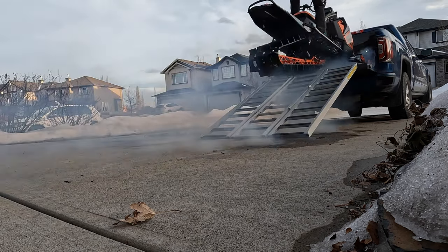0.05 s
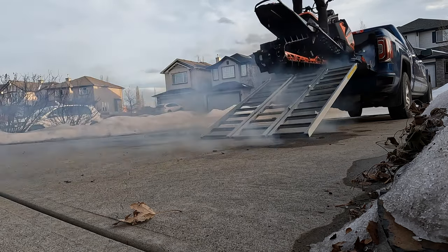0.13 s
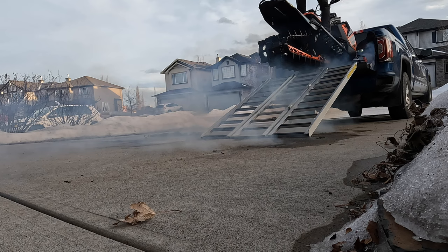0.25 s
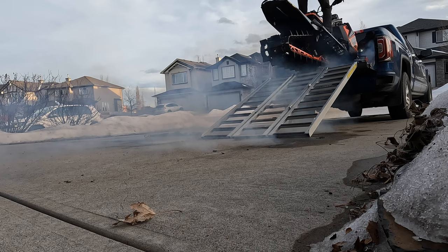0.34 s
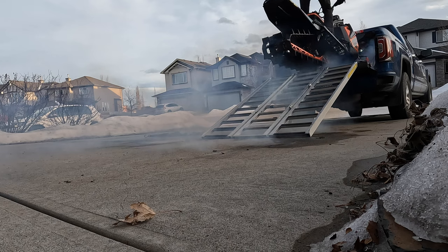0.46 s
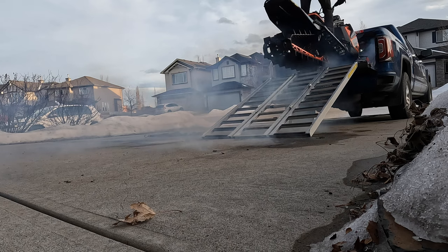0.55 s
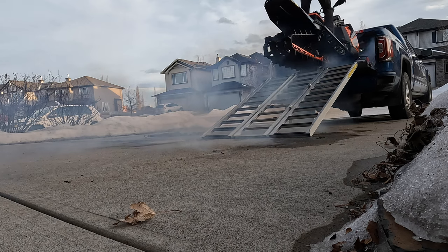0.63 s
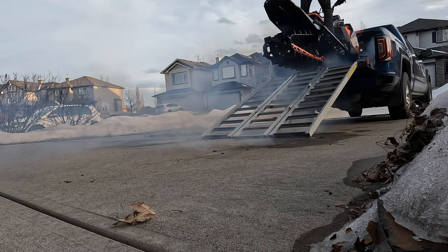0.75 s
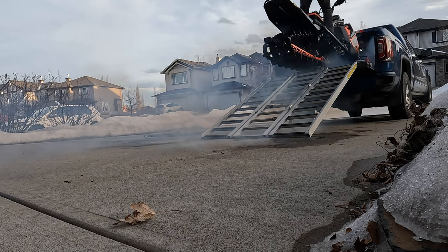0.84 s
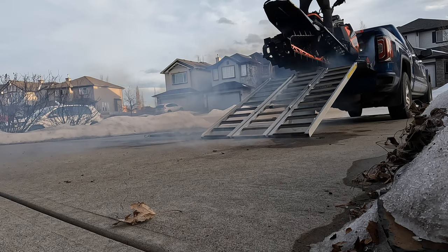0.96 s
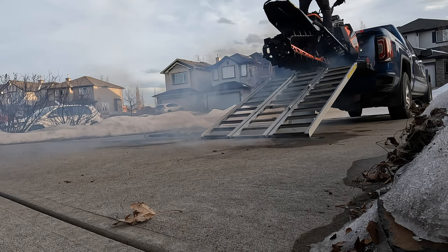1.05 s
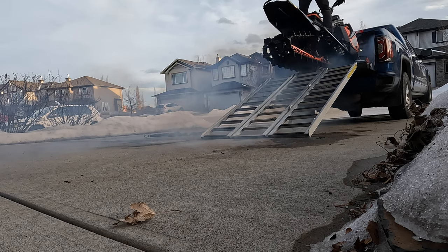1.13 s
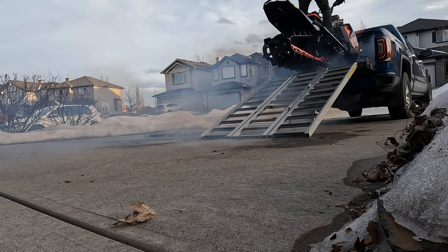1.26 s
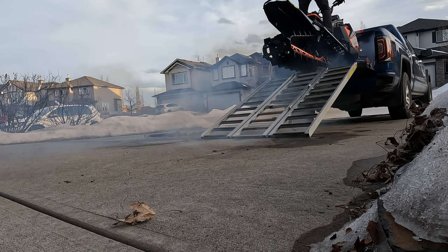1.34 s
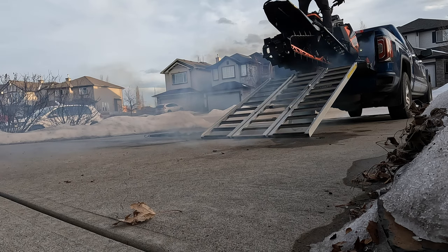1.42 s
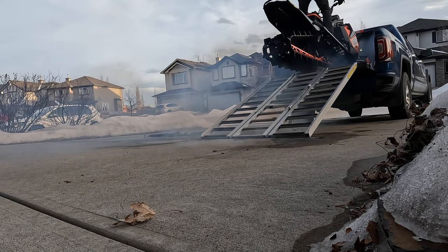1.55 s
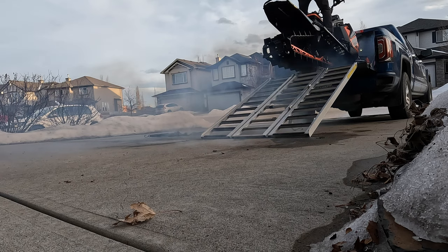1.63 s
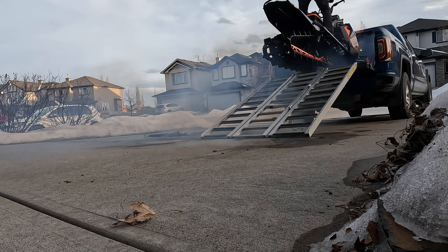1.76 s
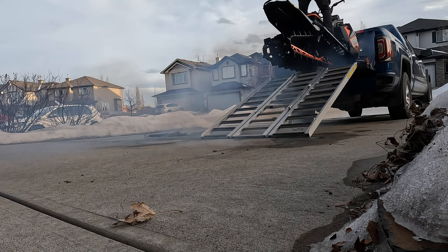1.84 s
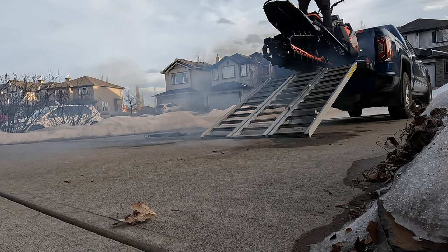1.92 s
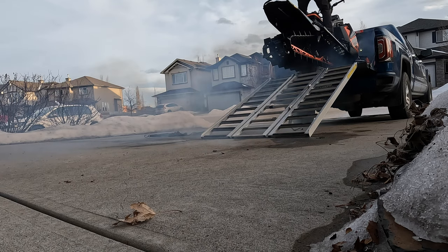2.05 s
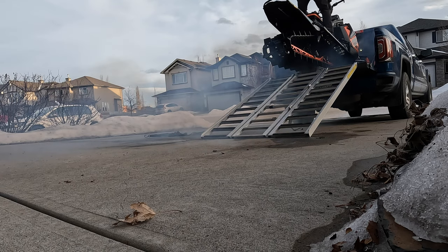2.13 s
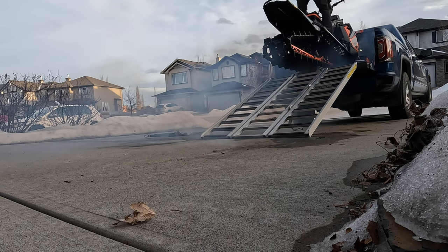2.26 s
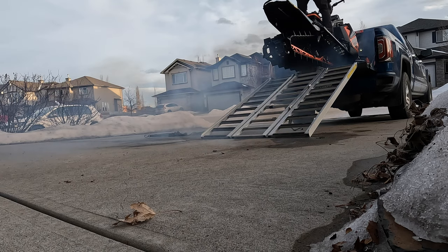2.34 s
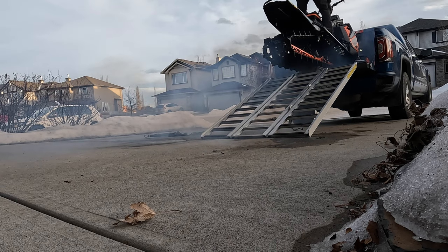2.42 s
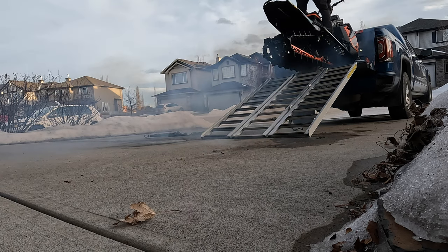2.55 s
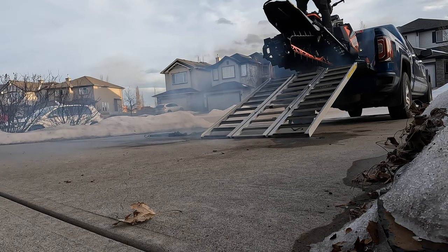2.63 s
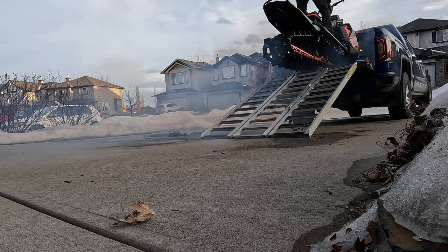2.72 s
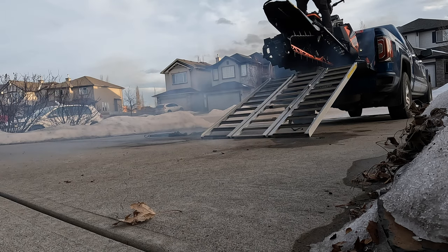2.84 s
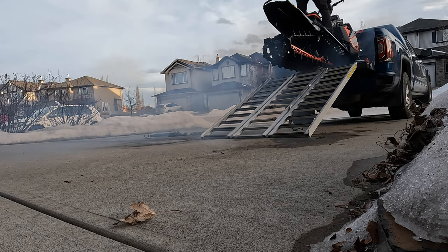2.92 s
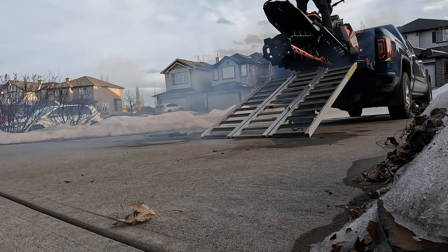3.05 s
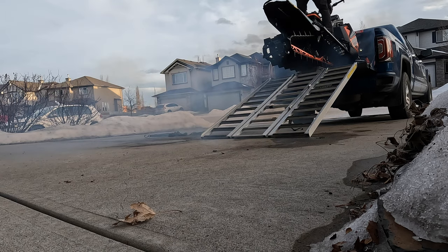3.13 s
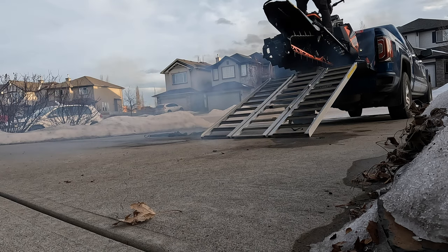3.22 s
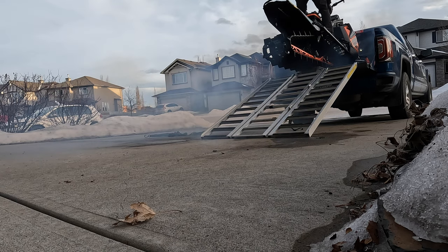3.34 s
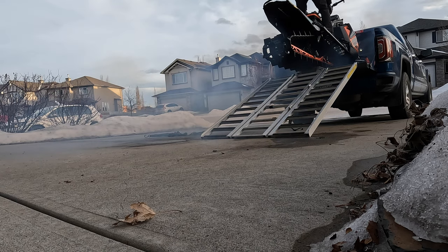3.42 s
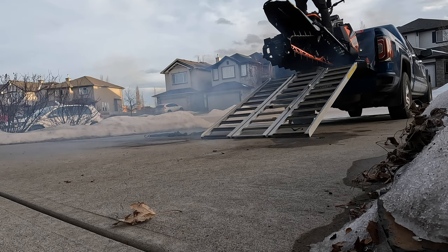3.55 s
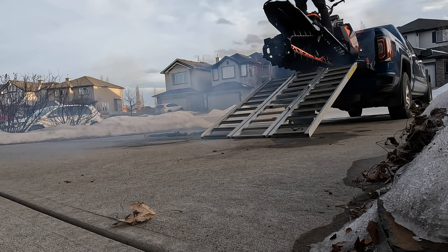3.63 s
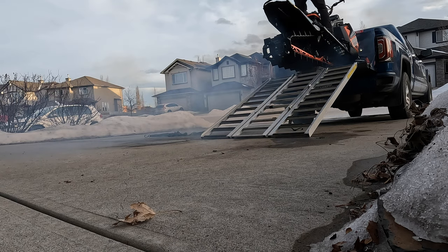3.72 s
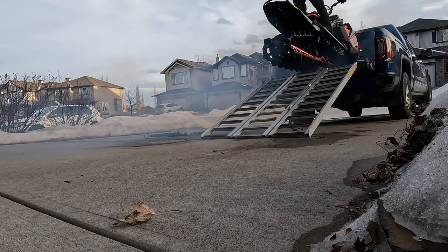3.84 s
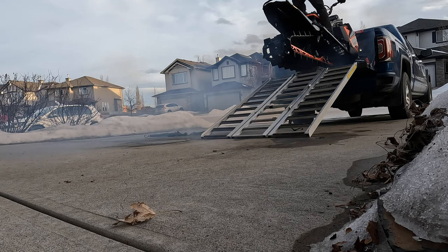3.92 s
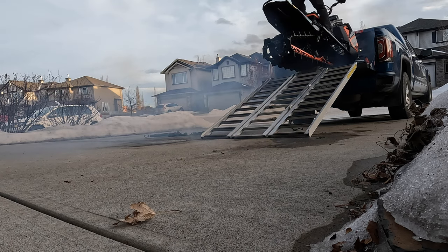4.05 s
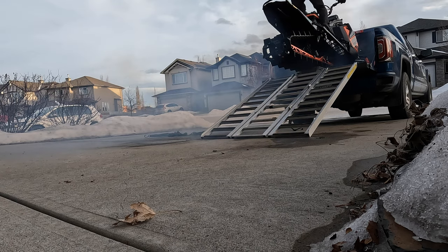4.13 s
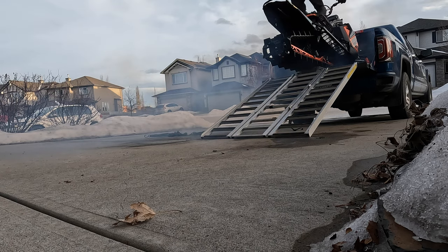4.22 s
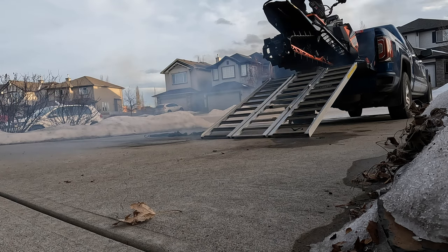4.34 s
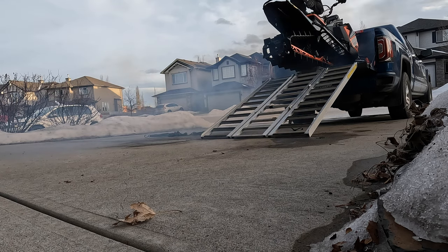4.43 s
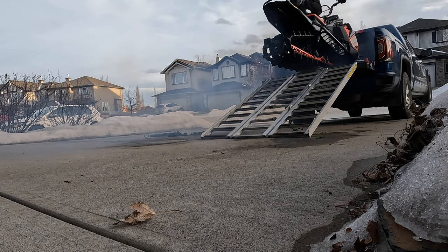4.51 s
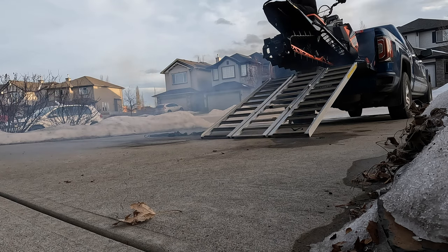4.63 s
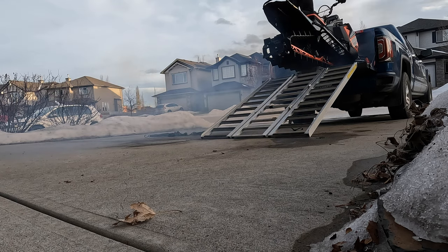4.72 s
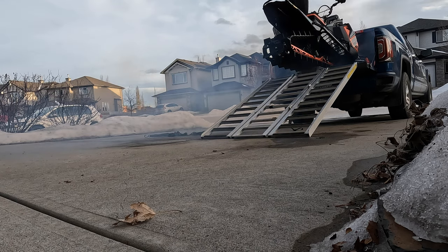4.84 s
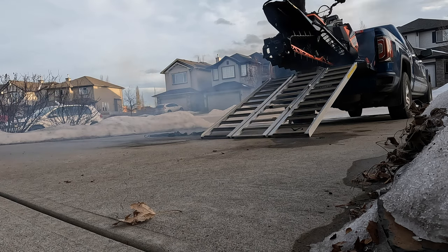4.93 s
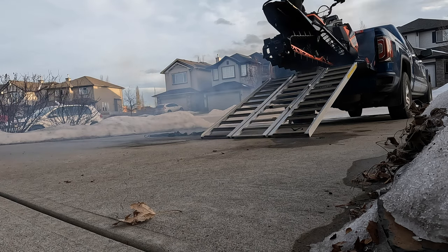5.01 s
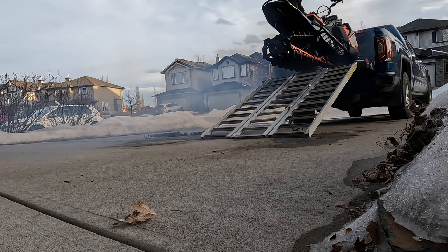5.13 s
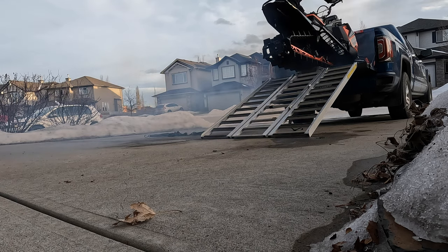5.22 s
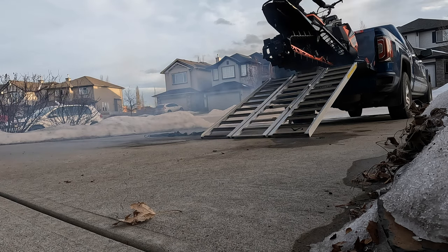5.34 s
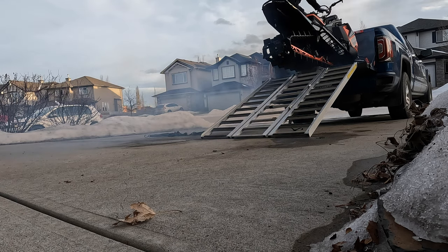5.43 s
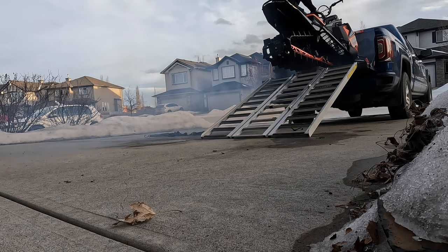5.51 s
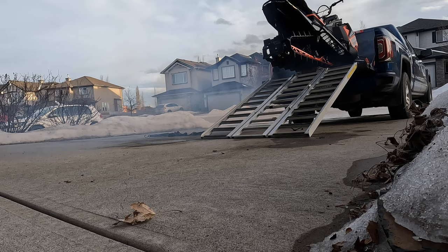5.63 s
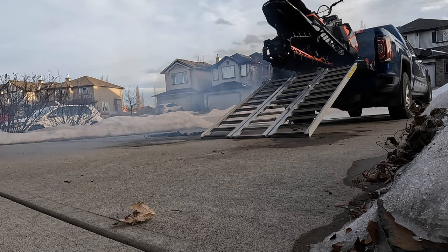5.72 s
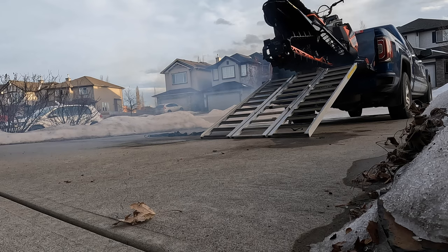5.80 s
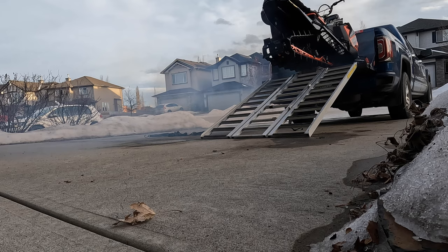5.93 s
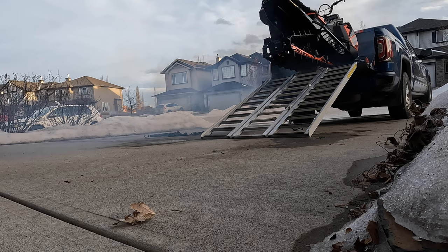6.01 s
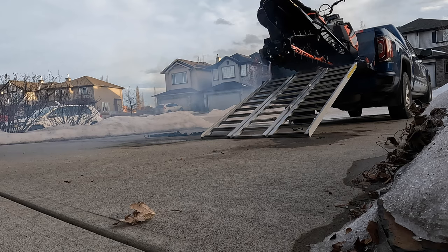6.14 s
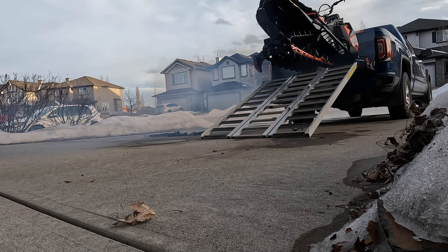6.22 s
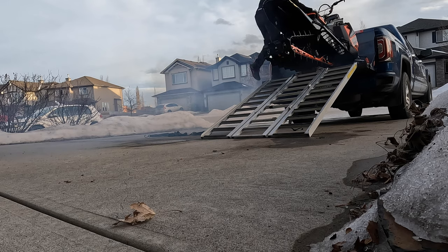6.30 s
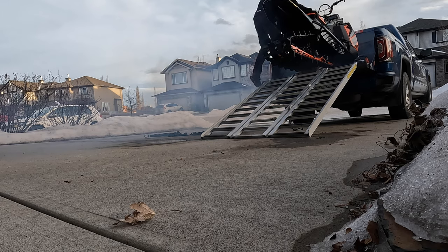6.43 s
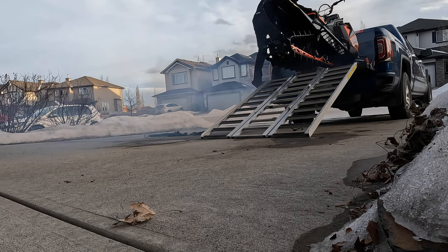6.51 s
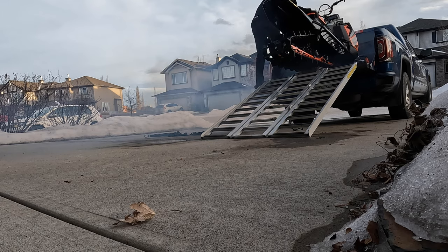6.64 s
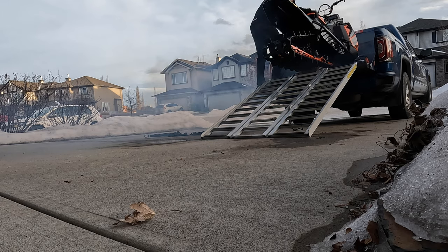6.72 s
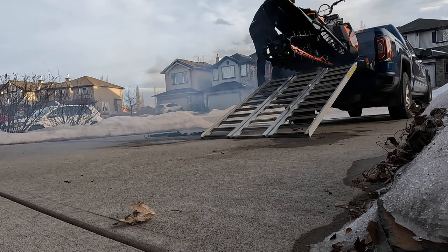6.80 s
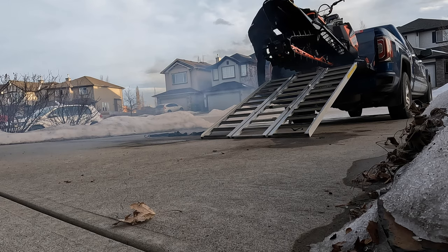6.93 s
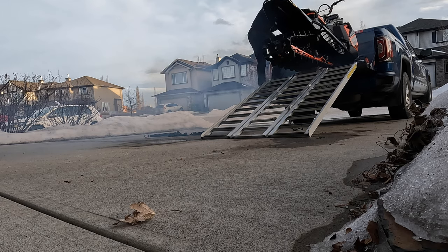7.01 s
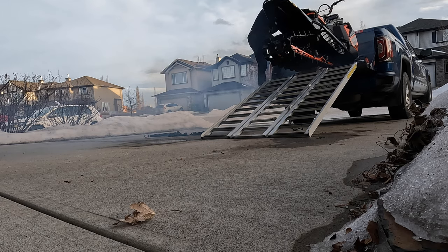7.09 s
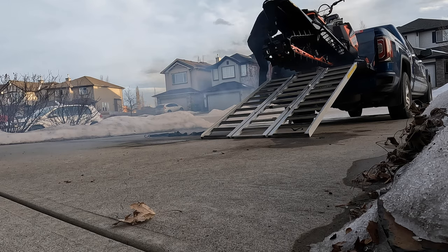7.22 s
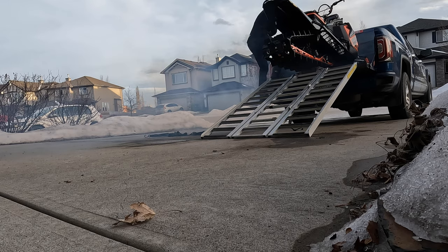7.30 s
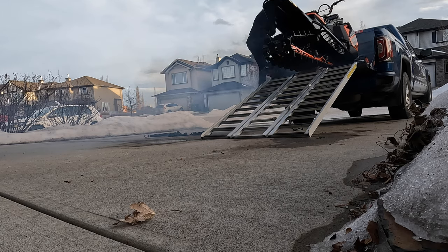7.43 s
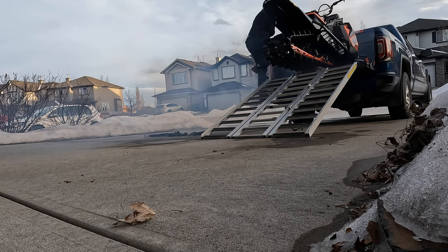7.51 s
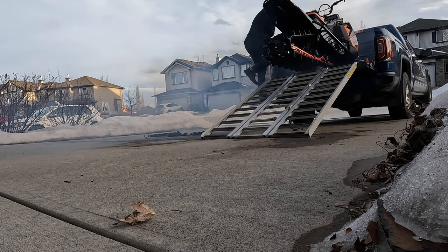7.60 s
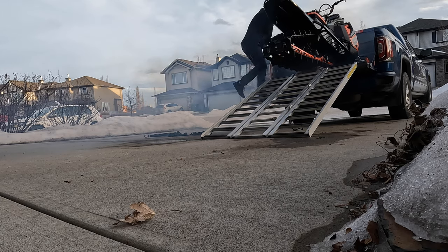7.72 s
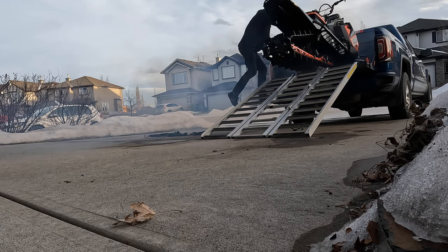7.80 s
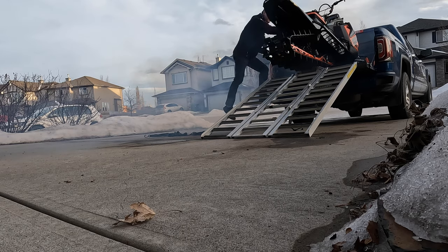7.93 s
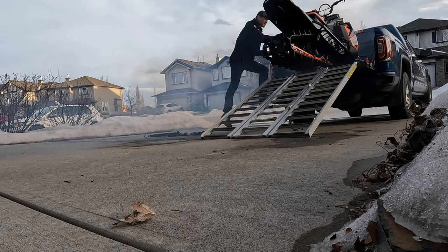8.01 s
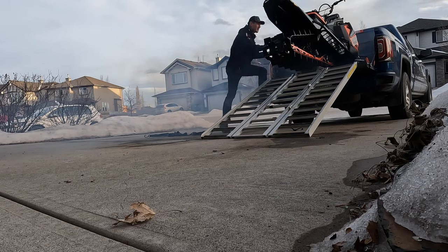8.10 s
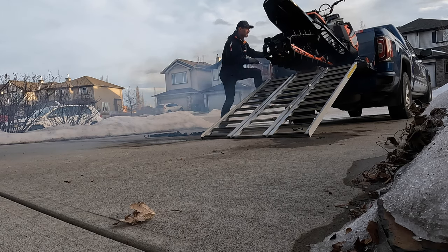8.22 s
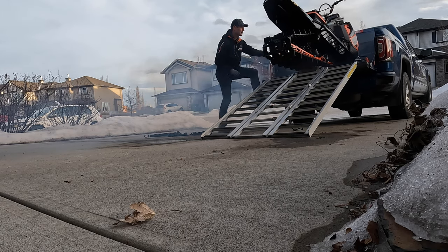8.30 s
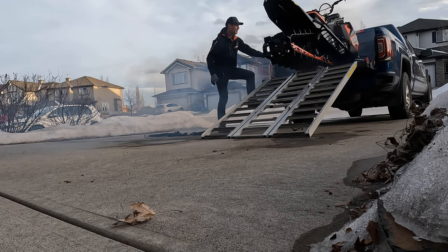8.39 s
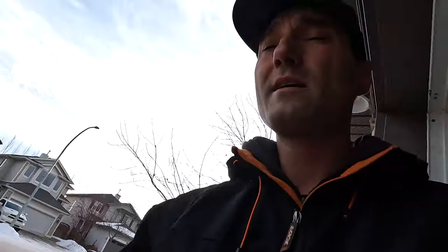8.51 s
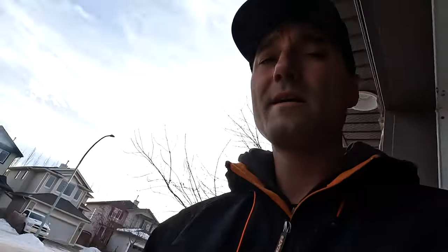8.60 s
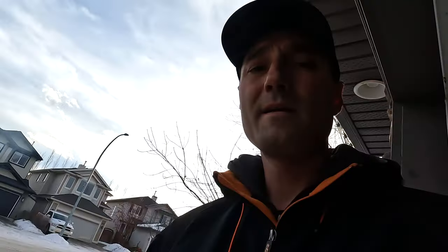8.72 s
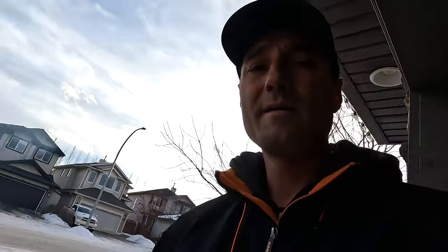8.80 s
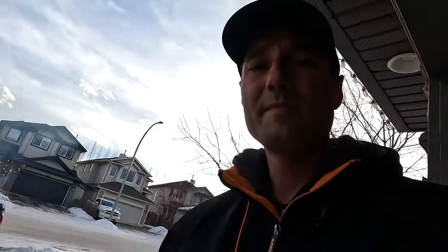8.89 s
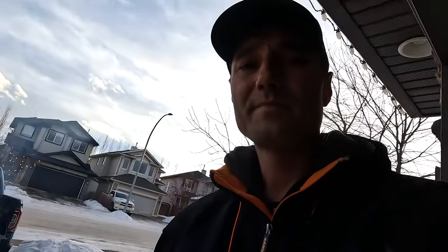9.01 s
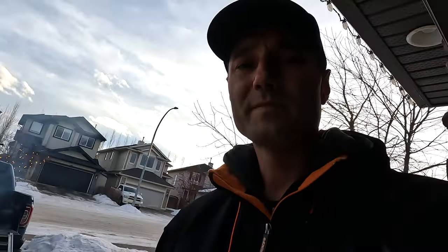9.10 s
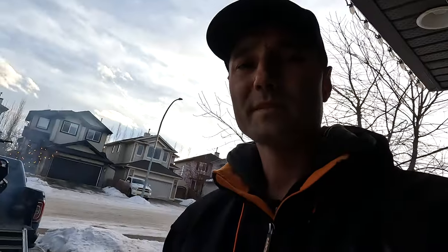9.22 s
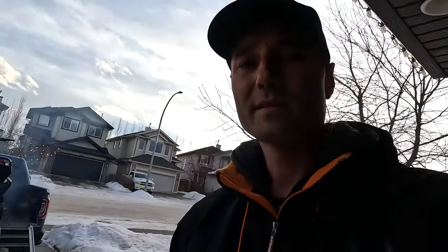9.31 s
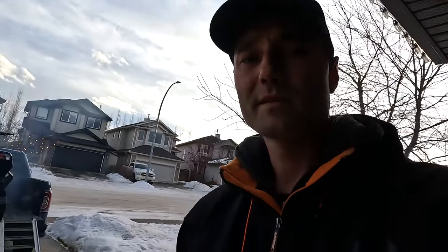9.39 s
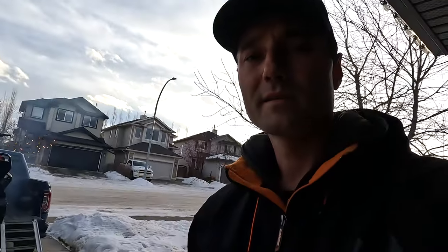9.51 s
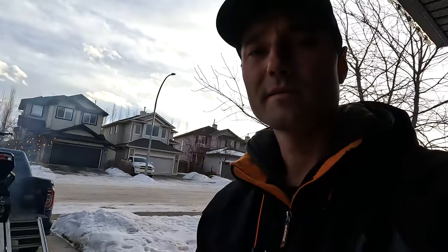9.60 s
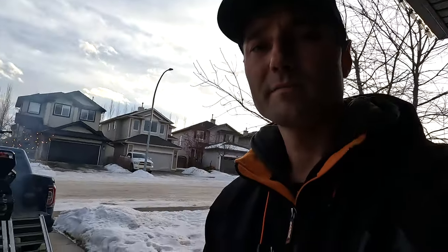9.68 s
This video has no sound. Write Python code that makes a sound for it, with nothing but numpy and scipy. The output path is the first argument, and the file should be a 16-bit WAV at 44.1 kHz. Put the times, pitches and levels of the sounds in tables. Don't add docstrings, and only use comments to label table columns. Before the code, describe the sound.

A snowmobile on a truck bed idles loudly and unevenly, popping several times a second over a buzzing, hissing drone. The ignition is cut; strokes slow, thump and stop with a small clutch rattle. Soft distant traffic remains while someone climbs down: dull boot thuds, gritty drags, cloth rustle, loose ticks and sharp knocks on the ramp. Slight echo off houses, stereo microphone near the ground, then a sudden change to a hushed porch.

```python
import sys
import numpy as np
from scipy import signal
from scipy.fft import rfft, irfft, next_fast_len
from scipy.io import wavfile
from scipy.ndimage import uniform_filter1d, minimum_filter1d

SR = 44100
rng = np.random.default_rng(int(sys.argv[2]) if len(sys.argv) > 2 else 0)


def dump(signal):
    limited = np.clip(np.atleast_2d(signal).T, -1, 1)
    pcm = np.round(limited * 32767).astype(np.int16)
    wavfile.write(sys.argv[1], SR, pcm)


def gain_from_db(level_db):
    decades = np.asarray(level_db, float) / 20
    return 10 ** decades


N = 429975
TIME = np.arange(N) / SR
JUMP_S = 8.523


def unit(x):
    return x / np.sqrt(np.mean(x ** 2))


def shape(points, size):
    hz, db = np.transpose(points)
    bin_hz = np.arange(size // 2 + 1) * SR / size
    return gain_from_db(np.interp(np.log(bin_hz + 1), np.log(hz), db))


def noise(points, x=None):
    size = next_fast_len(N)
    x = rng.standard_normal(N) if x is None else x
    return unit(irfft(rfft(x, size) * shape(points, size), size)[:N])


def walk(rate):
    k = int(SR / rate)
    held = np.repeat(rng.standard_normal(N // k + 1), k)
    return 1.1 * uniform_filter1d(uniform_filter1d(held, k), k)[:N]


def curve(table):
    return np.interp(TIME, *np.transpose(table))


def kicks(s, size):
    x = np.zeros(N)
    np.add.at(x, np.clip((np.asarray(s) * SR).astype(int), 0, N - 1), size)
    return x


def fade(x, t60):
    return signal.lfilter([1], [1, -np.exp(-np.log(1000) / (t60 * SR))], x + 1e-18)


def ring(x, modes):
    out = 0
    for k, (hz, db, t60) in enumerate(modes):
        r, w = np.exp(-np.log(1000) / (t60 * SR)), 2 * np.pi * hz / SR
        note = signal.lfilter([0, r * np.sin(w)], [1, -2 * r * np.cos(w), r * r], x + 1e-18)
        out = out + (-1) ** k * gain_from_db(db) * note
    return out


def swells(s, hold, db, rise_db, fall_db):
    t, out = np.arange(0, N, 32) / SR, 0
    for start, held, top_db, rise in zip(s, hold, db, rise_db + 0 * s):
        early, late = np.maximum(start - t, 0), np.maximum(t - start - held, 0)
        out = out + gain_from_db(top_db - rise * early - fall_db * late)
    return np.interp(TIME, t, out)


def on_deck():
    return np.clip((TIME - 4.1) / 0.23, 0, 1) * np.clip((JUMP_S - TIME) / 0.0013, 0, 1)


# f/Hz, level/dB per Hz
TRAFFIC = [(120, -17), (200, -19.5), (258, -1), (365, -27.5), (462, -19), (564, -5), (1150, -1.5),
           (2510, -33), (6820, -38), (12400, -45), (15500, -82)]
# t/s, level/dB
TRAFFIC_LEVEL = [
    (4.2, -47.5),
    (4.8, -48.5),
    (5.3, -42),
    (8.52, -41.5),
]


def traffic():
    return gain_from_db(curve(TRAFFIC_LEVEL) + 2.5 + .7 * walk(6)) * noise(TRAFFIC)


# f/Hz, level/dB per Hz
PORCH = [(12, -29), (20, 1), (27, -9), (115, -30), (361, -25), (596, -28), (766, -22), (1340, -29),
         (1720, -40), (2200, -41), (3640, -55), (13500, -69), (15500, -78)]
PORCH_DB = -45


def porch():
    opening = np.clip((TIME - JUMP_S) / .04, .4, 1) * (TIME > JUMP_S)
    return gain_from_db(PORCH_DB + 2.5 + .9 * walk(9)) * noise(PORCH) * opening


def coolant_pump():
    return gain_from_db(-42.5) * unit(ring(rng.standard_normal(N), [(141.0, 0, 3.8)])) * (TIME < 5.64)


# f/Hz, level/dB per Hz
DECK = [(12, -41.5), (20, -4), (60, 6.5), (102, 4), (139, -2), (255, -4), (387, -10.5), (500, -7),
        (650, -40.5), (1100, -120)]
# start t/s, hold t/s, level/dB
SWAYS = [
    (4.22, 0.086, -26),
    (5.23, 0.047, -33),
    (5.683, 0.038, -24),
    (5.783, 0.27, -27.5),
    (6.29, 0.023, -27.5),
    (6.823, 0.37, -33.5),
    (7.25, 0.62, -29),
    (8.036, 0.067, -35),
    (8.407, 0.12, -26),
]
SWAY_RISE_DB_S, SWAY_FALL_DB_S, DECK_REST_DB, DECK_WOBBLE_DB = 155, 89.5, -35.5, 2.5


def deck():
    sway = gain_from_db(DECK_REST_DB) + swells(*np.transpose(SWAYS), SWAY_RISE_DB_S, SWAY_FALL_DB_S)
    return sway * gain_from_db(-4.5 + DECK_WOBBLE_DB * walk(14)) * noise(DECK)


# f/Hz, level/dB per Hz
SCRAPE = [(180, -33.5), (300, 12), (489, -47), (636, -1), (920, -0.5), (2570, -8), (2930, -4.5),
          (7000, -19.5), (9100, -42.5), (15400, -120)]
# f/Hz, level/dB per Hz
RUSTLE = [(4120, -2), (7000, -1), (10700, -2.5), (12500, -5), (15500, -23.5)]
# f/Hz, level/dB, t60/s
RUNGS = [(3040, 6, 0.058), (3580, 5, 0.035)]
# start t/s, hold t/s, scrape level/dB, its hiss minus scrape level/dB
DRAGS = [(5.156, 0.091, -53, -30), (5.764, 0.086, -43, -7.5), (5.708, 0.16, -61, -25),
         (6.013, 0.12, -43.5, -9.5), (6.263, 0.0095, -28.5, -25), (6.835, 0.074, -61, 3.5),
         (7.183, 0.0077, -42.5, -29), (7.244, 0.12, -47.5, -25.5), (7.42, 0.017, -43.5, -16),
         (7.5, 0.1, -54, -2.5), (7.6, 0.01, -46, -27), (7.75, 0.022, -43, -23.5),
         (7.992, 0.016, -48.5, -11), (7.861, 1, -65.5, -0.5), (8.411, 0.1, -36.5, -8)]
# start t/s, hold t/s, level/dB
SWISHES = [
    (5.758, .018, -36.5),
    (6.283, 0.0043, -35),
    (6.391, .008, -53),
    (8.414, 0.0089, -39.5),
]
DRAG_RISE_DB, DRAG_FALL_DB_S = 22, 192
SWISH_RISE_DB_S, SWISH_FALL_DB_S = 549, 483


def soles():
    s, hold, db, hiss_db = np.transpose(DRAGS)
    rise_db_s = DRAG_RISE_DB / np.maximum(hold, .01)
    slips = gain_from_db(0.73 * rng.exponential(size=N)) * (rng.random(N) < 900 / SR)
    grains = rng.standard_normal(N) * fade(slips, 0.051)
    grit = noise(SCRAPE, grains) + gain_from_db(-12.5) * unit(ring(grains, RUNGS))
    scrape = swells(s, hold, db, rise_db_s, DRAG_FALL_DB_S) * grit
    rustle = swells(s, hold, db + hiss_db + 0.5, rise_db_s, DRAG_FALL_DB_S) * noise(RUSTLE, grains)
    wipes = swells(*np.transpose(SWISHES), SWISH_RISE_DB_S, SWISH_FALL_DB_S)
    swish = wipes * noise(RUSTLE, np.sign(grains))
    return gain_from_db(3.5 + 2.2 * walk(33)) * (scrape + rustle) + swish


# t/s, level/dB
TICKS = [(5.0846, -30.5), (5.1243, -37), (5.1582, -39), (5.2011, -39.5), (5.25, -28.5), (5.314, -34.5),
         (5.6326, -41), (5.652, -38), (5.7247, -31.5), (5.7515, -38), (6.033, -30.5), (6.0927, -32.5),
         (6.1013, -28), (6.253, -36.5), (6.27, -17), (6.278, -30), (6.042, -31), (6.3855, -30.5),
         (6.6218, -42), (6.783, -41), (6.8334, -38.5), (7.0484, -41.5), (7.1075, -36), (7.168, -22.5),
         (7.2348, -35), (7.2725, -31), (7.4208, -26), (7.597, -27.5), (7.747, -34.5), (8.31, -33.5),
         (8.3637, -43.5), (8.3931, -35)]


def ticks():
    s, db = np.transpose(TICKS)
    bursts = fade(kicks(s, gain_from_db(db)), 0.091) * rng.standard_normal(N)
    return gain_from_db(-7) * ring(bursts, [(3060, 2.5, 0.00057), (5530, -1.0, 0.00071), (1250, -6.0, 0.0034)])


# t/s, peak level/dB, f/Hz, t60/s
TAPS = [(4.087, -3, 50, 0.078), (4.162, -10, 165, .12), (4.229, -7.5, 48.3, 0.081),
        (4.343, -11, 61.6, 0.12), (4.344, -14.5, 165, 0.079), (5.823, -17.5, 80, 0.055),
        (5.868, -24.5, 483, .05), (5.977, -16.5, 95, 0.06), (7.1765, -10.5, 2205, 0.0033),
        (7.199, -28, 128.5, 0.063), (7.836, -21, 70, 0.087), (7.887, -18.5, 79, 0.066),
        (8.041, -18, 61.9, 0.13), (8.173, -18, 55.3, 0.055), (8.1841, -5, 1250, 0.0073),
        (8.1872, -17.5, 1350, 0.01), (8.1919, -16.5, 1230, 0.011), (8.435, -22, 171.4, 0.021),
        (8.463, -16.5, 248, .05), (8.49, -23.5, 162, .05), (8.508, -12, 173, 0.034),
        (7.502, -38.5, 5280, .06), (5.072, -23, 59.9, 0.056), (5.048, -23.5, 55, 0.051),
        (5.256, -22, 330, 0.032), (5.263, -21, 250, .05), (5.314, -24.5, 90.7, .05), (4.934, -25, 110, .05),
        (5.6428, -13, 184, 0.083), (3.801, -16, 334, 0.12), (3.885, -14, 324, .15), (4.07, -16, 331, 0.27),
        (5.845, -24, 2280, .03), (8.395, -33, 3820, 0.099), (8.415, -26, 2860, 0.068),
        (8.5, -32, 2850, .05), (8.965, -27.5, 560, .04), (9.18, -49, 2140, .04), (9.18, -41.5, 1450, 0.049)]


def taps():
    return -sum(ring(kicks([s], 1.0), [(hz, db, t60)]) for s, db, hz, t60 in TAPS)


# t/s, knock level/dB, note f/Hz, boom minus knock level/dB
KNOCKS = [(4.282, -30.5, 530, -17.5), (4.402, -26, 444, 4), (5.198, -24, 1150, -9.5),
          (5.633, -22.5, 930, 11), (5.658, -23.5, 476, -15), (5.953, -33, 490, 5.5),
          (7.127, -11.5, 494, -30), (7.1337, -29.5, 540, -29), (7.157, -17.5, 497, -29),
          (7.148, -16, 1020, -30), (7.166, -10.5, 1046, -32), (7.176, -19.5, 463, 4),
          (7.428, -32.5, 450, 17)]
# t/s, knock level/dB, note f/Hz, boom minus knock level/dB, clash level/dB
CLASHES = [(5.088, -27, 562, -8, -43.5), (5.254, -26, 498, 1.5, -35.5), (5.844, -18, 926, -23, -33.5),
           (6.039, -44, 362, 20, -20), (6.111, -35, 705, 11, -33.5), (6.261, -17.5, 1260, -32.5, -6.5),
           (6.281, -25.5, 462, 0, -21.5), (6.699, -34, 419, -15, -32), (6.857, -37.5, 543, 10.5, -25.5),
           (7.1755, -11.5, 1036, -36, -29.5), (7.601, -31, 405, 13.5, -38), (8, -46, 995, 4, -36.5),
           (8.1852, -18.5, 1280, -17, -38.5), (8.411, -28, 452, -2.5, -21)]
TICK_DB = -49.5


def knocks():
    rows = [(*row, TICK_DB) for row in KNOCKS] + CLASHES
    out, t = np.zeros(N + SR), np.arange(SR // 2) / SR
    fall = lambda t60: np.exp(-np.log(1000) * t / t60)
    for s, db, hz, boom_db, clash_db in rows:
        n = rng.standard_normal(len(t))
        t60 = .085 * (500 / hz) ** 1.6
        blow = 0.39 * (t == 0) + 0.094 * n * fall(0.14 * min(500 / hz, 1))
        note = ring(blow, [(hz, -4, t60), (0.69 * hz, -8, t60 / 2), (1.14 * hz, -6, t60 / 2),
                           (1.8 * hz, -13, t60 / 4), (2.7 * hz, -11, t60 / 8)])
        boom = ring(blow, [(94.0, -27.5, 0.24), (169.0, -7, 0.15), (262, -7.5, 0.065)])
        grit = uniform_filter1d(np.diff(n, prepend=0), size=3)
        clash = gain_from_db(-4.0) * grit * (fall(0.11) + 0.11 * fall(0.26)) * np.minimum(t / 0.0017, 1)
        i = int(s * SR)
        out[i:i + len(t)] += gain_from_db(db) * (note + gain_from_db(boom_db) * boom) + gain_from_db(clash_db) * clash
    return out[:N]


# t/s, level/dB
CLACKS = [
    (4.2815, -45.5),
    (4.3958, -41.5),
    (4.448, -58.5),
    (4.4994, -58),
]
# f/Hz, level/dB, t60/s
CLUTCH = [(2760, 3.5, 0.0055), (2080, 4.5, 0.0048), (7000, -8, .005), (3680, -5.5, 0.0093),
          (5250, -5, 0.0064), (700, 4.5, 0.052)]


def clacks():
    s, db = np.transpose(CLACKS)
    return gain_from_db(-13.5) * ring(fade(kicks(s, gain_from_db(db)), 0.29) * rng.standard_normal(N), CLUTCH)


# t/s, crack level/dB, strokes until a second charge lights, its level/dB
FIRINGS = [(0.199, -8.5, 5, -9), (0.2766, -8, 3, -56), (0.333, -1.5, 5, -9), (0.4815, -4.5, 3, -53),
           (0.5913, -6, 3, -9), (0.706, -2.5, 3, -10), (.823, -6, 3, -13), (0.9441, -3.5, 3, -61),
           (1.0542, -4.5, 8, -10.5), (1.171, -3.5, 3, -10), (1.2995, -6, 5, -14), (1.4061, -9.5, 5, -11.5),
           (1.5125, -6, 3, -48.5), (1.5876, -4.5, 3, -9), (1.697, -8.5, 3, -9), (1.8085, -8.5, 5, -13),
           (1.919, -7, 4, -11.5), (2.05, -4.5, 3, -10.5), (2.1613, -5, 3, -10.5), (2.2857, -16, 1, -4.5),
           (2.4063, -9, 1, -9), (2.5186, -6, 1, -10), (2.632, -9.5, 1, -9), (2.7438, -5.5, 3, -12),
           (2.855, -6.5, 3, -9), (2.9674, -8, 3, -8), (3.0585, -9.5, 3, -51), (3.14, -8, 1, -14.5),
           (3.254, -6, 3, -10), (3.366, -5.5, 3, -8.5)]
# t/s, strokes per s
SPEED = [(0.0, 134.0), (0.19, 135.4), (0.45, 111.3), (1.01, 96.7), (1.84, 90.3), (2.65, 86.8), (2.84, 90.8),
         (2.97, 86.8), (3.14, 88.3), (3.42, 86.0), (3.482, 80.7), (3.636, 69.3), (3.826, 53.0),
         (3.902, 47.0), (4.1, 35.3), (4.42, 18.9), (4.6, 11.9)]
REV_START_S, REV_GAP_S, REV_DB = 0.00024, .02937, -11.5
REV_PAIR_S, REV_PAIR_DB = .0075, -14.5


def lit():
    s, db, later, again_db = np.transpose(FIRINGS)
    gap = np.round(later) / np.interp(s, *np.transpose(SPEED))
    rev = REV_START_S + REV_GAP_S * np.arange(7)
    none = 0 * rev
    rows = np.c_[[rev, REV_DB + none, 1 + none], [rev + REV_PAIR_S, REV_PAIR_DB + none, none],
                 [s, db, 0 * s], [s + gap, again_db, 1 + 0 * s]]
    return rows[:, np.argsort(rows[0])]


def strokes(hz):
    free = np.cumsum(hz) / SR
    at = (lit()[0] * SR).astype(int)
    whole = np.cumsum(np.round(np.diff(free[at], prepend=0)))
    return free + uniform_filter1d(np.interp(np.arange(N), at, whole - free[at]), size=600)


# t/s, level/dB
PUMPING = [(0.0, -7.5), (0.18, -4), (0.4, -7), (3.22, -8), (3.32, -9), (3.98, -3.5), (4.03, -14.5),
           (4.11, -14.5), (4.18, -12), (4.28, -26), (4.35, -21), (4.6, -47)]
# multiple of the stroke rate, level/dB
STROKE = [(.5, -10), (1, -3.5), (1.5, 4.5), (2, 4.5), (2.5, -8), (3, 4.5), (4, -3), (5, -15), (5.5, -11),
          (6, -19), (7, -14.5)]
# f/Hz, level/dB
INTAKE = [(50, -16.5), (110, -14), (165, 0.5), (215, -3), (270, -3.5), (330, -5.5), (410, -11.5),
          (600, -11.5), (1000, -33)]
# f/Hz, level/dB, t60/s
AIRBOX = [(165.3, 4, 0.36), (342, -4, 0.64), (212, -9, 0.065)]
# f/Hz, level/dB per Hz
HISS = [(1060, -22), (1800, -7.5), (2470, -5), (3530, -9), (5960, -15.5), (7000, -15), (8540, -26),
        (10400, -25), (14100, -43), (15500, -58)]
# f/Hz, level/dB, t60/s
FINS = [(6900, -5.5, .03), (7350, 3.5, .06), (7500, -5.5, .05), (8998, -9, .06), (10031, -7.5, .08),
        (10214, -9, .06)]
# f/Hz, level/dB per Hz
DRONE = [(180, -4), (300, 0), (419, -8), (483, -1), (544, -15), (613, -10.5), (842, -17.5), (1090, -16),
         (1210, -10.5), (1670, -26.5), (2000, -24), (2600, -43.5), (4400, -120)]
IDLE_HZ = 97.4
HISS_DB, HISS_DB_PER_OCT, WARM_DB_PER_S = -35.5, 12.5, 2
DRONE_DB, DRONE_DB_PER_OCT, DRONE_KNEE_HZ = -25.5, 12.5, 65
RUMBLE_DB, RUMBLE_DB_PER_OCT, RUMBLE_SWAY_DB = -22, 6, 1.5
SPARK_CUT_S, FREEWHEEL_DB, UNLIT_DB = 3.46, -10, -1
HALF_UNLIT_DB, HALF_FAST_DB_PER_OCT = -5.5, -30
UNLIT_LEAD, UNLIT_DB_PER_ORDER = .9, 1.5
FIRST_FAST_DB_PER_OCT = -13.5
UNLIT_DRONE_DB, COAST_SECOND_DB = -1, 3.5


def intake_pump(hz, phase, slow, unlit):
    intake_hz, intake_db = np.transpose(INTAKE)
    fast = np.log2(np.maximum(hz / 100, 1))
    alike_db = HALF_UNLIT_DB * unlit + HALF_FAST_DB_PER_OCT * fast
    first_db = FIRST_FAST_DB_PER_OCT * fast
    second_db = COAST_SECOND_DB * np.clip((78 - hz) / 15, 0, 1)
    wave = 0
    for k, db in STROKE:
        level_db = db + np.interp(np.log(k * hz), np.log(intake_hz), intake_db) + alike_db * (k % 1 > 0)
        level_db = level_db + UNLIT_DB_PER_ORDER * unlit * max(k - 3, 0)
        level_db = level_db + first_db * (k == 1) + second_db * (k == 2) + 2.1 * walk(12)
        wave = wave - gain_from_db(level_db) * np.cos(2 * np.pi * k * (phase - .45) + UNLIT_LEAD * unlit)
    at = np.flatnonzero(np.diff(np.floor(phase)))
    uneven_db = rng.standard_normal(len(at)) * (4.5 - 2.5 * unlit[at])
    gulps = ring(uniform_filter1d(kicks(at / SR, gain_from_db(uneven_db)), size=110), AIRBOX)
    pump = gain_from_db(-8 * slow) * wave + gain_from_db(-15.0 + 12 * slow) * gulps
    pump = pump / np.sqrt(uniform_filter1d(pump ** 2, SR // 6) + 1e-4)
    return gain_from_db(curve(PUMPING) - 3.5) * pump


def gas_hiss(hz, slow, unlit):
    db = HISS_DB + HISS_DB_PER_OCT * np.log2(np.minimum(hz / IDLE_HZ, 1))
    db = db + WARM_DB_PER_S * np.minimum(TIME, 2.5) + 6.4 * np.log2(np.maximum(hz / 112, 1))
    hiss = gain_from_db(db + UNLIT_DB * unlit + 1.0 + 1.2 * walk(8.15)) * noise(HISS)
    hiss = hiss + gain_from_db(-42.5) * ring(np.roll(hiss, SR // 10), FINS)
    dull = uniform_filter1d(hiss, size=3)
    return hiss + unlit * (1 + slow) / 2 * (dull - hiss)


def can_drone(hz, slow, unlit):
    db = DRONE_DB + DRONE_DB_PER_OCT * np.log2(np.minimum(hz / DRONE_KNEE_HZ, 1))
    return gain_from_db(db + UNLIT_DRONE_DB * unlit * (0.5 - slow) + 5.0 + 0.5 * walk(21)) * noise(DRONE)


def chassis_rumble(hz, slow, unlit):
    db = RUMBLE_DB + RUMBLE_DB_PER_OCT * np.log2(np.minimum(hz / IDLE_HZ, 1))
    db = db + RUMBLE_SWAY_DB * walk(3.6) + FREEWHEEL_DB * unlit * (1 - slow ** 2)
    return gain_from_db(db + 6.5) * noise([(15, -21.5), (30, -6.5), (37, -2.5), (48, -2.5), (62, -1), (85, -8.5),
                                  (200, -5.5), (400, -125.5)])


def engine():
    hz = curve(SPEED)
    slow = np.clip((62 - hz) / 20, 0, 1)
    unlit = np.clip((TIME - SPARK_CUT_S) / 0.011, 0, 1)
    phase = strokes(hz * (1 + 0.04 * slow * walk(25)))
    puff = uniform_filter1d((1.69 + np.exp(-(phase % 1) / 0.46)) / 2, size=60)
    gas = puff * (gas_hiss(hz, slow, unlit) + can_drone(hz, slow, unlit))
    running = np.clip((4.57 - TIME) / 0.044, 0, 1)
    return running * (intake_pump(hz, phase, slow, unlit) + gas + chassis_rumble(hz, slow, unlit))


# f/Hz, level/dB, t60/s
THUMP = [(37, -15, 0.27), (60.4, -15.5, 0.18), (128.5, -3, 0.3), (165, -2.5, 0.65), (228, -9.5, 0.13)]
# f/Hz, level/dB, t60/s
PIPE = [(482.5, 3, 0.15), (615.4, -6, 0.16), (730, -6, 0.081)]
# f/Hz, level/dB, t60/s
CAN = [(1177, -8, 0.054), (1252, -1.5, 0.15), (1317, -11, 0.18), (1405, -7, 0.1), (1526, -12, 0.2),
       (1799, -21, 0.34), (2107, -9.5, 0.064), (2405, -0.5, 0.008), (2440, -13, 0.095)]
# f/Hz, level/dB, t60/s
HOT_CAN = [(716, -6, 0.18), (1160, -11, 0.25), (1396, -4.5, 0.28), (1521, -3, 0.17), (1714, -12, 0.23),
           (1824, -13, 0.33), (2544, -11.5, 0.11), (2616, -13, 0.12)]
# f/Hz, level/dB, t60/s
RASP = [(2900, -1, 0.012), (4400, 1.5, 0.0099), (5030, -0.5, .006), (6000, -7, 0.0033)]
# f/Hz, level/dB per Hz
BLAST = [(350, -29), (600, 5), (843, -11), (1090, -6), (1220, -5.5), (1690, -8), (2470, -5.5),
         (3190, -16.5), (7030, -23), (10300, -46), (15500, -60)]
PIPE_DB, PIPE_HOT_DB, THUMP_DB, THUMP_HOT_DB, SCATTER_DB = -12.5, -22, -2.5, -3.5, 2
SATURATE = 0.38
SECOND_SNAP_DB = 5
COOL_RATIO, LEAN = 0.96, 0.091


def firings():
    s, db, second = lit()
    hot = np.clip((.85 - s) / 0.91, 0, 1)
    chance = SCATTER_DB * rng.standard_normal((2, len(s)))
    pipe_db = PIPE_DB + PIPE_HOT_DB * hot + chance[0] - SATURATE * db
    thump_db = THUMP_DB + THUMP_HOT_DB * hot + chance[1] - SATURATE * db
    crack = kicks(s, gain_from_db(db))
    turbulence = rng.standard_normal(N)

    def drive(share):
        pulse = kicks(s, share * gain_from_db(db))
        return pulse + gain_from_db(-23) * fade(pulse, 0.11) * turbulence

    lean = np.clip(.5 + LEAN * chance[0], 0, 1)
    cool = [(COOL_RATIO * hz, level_db, t60) for hz, level_db, t60 in CAN]
    can = ring(drive((1 - hot) * lean), CAN) + ring(drive((1 - hot) * (1 - lean)), cool)
    can = gain_from_db(-9.0) * can + gain_from_db(-11.5) * ring(drive(hot), HOT_CAN)
    rasp = gain_from_db(-33.5) * ring(fade(kicks(s, (hot + 0.25) * gain_from_db(db)), 0.051) * turbulence, RASP)
    pipe = gain_from_db(1.5) * ring(kicks(s, gain_from_db(db + pipe_db)), PIPE)
    thump = gain_from_db(-2) * ring(kicks(s + 0.0022, gain_from_db(db + thump_db)), THUMP)
    kick = gain_from_db(4.5) * ring(kicks(s + 0.00176, gain_from_db(db)), [(185, 1.1, 0.025)])
    bright = ring(kicks(s, gain_from_db(db + SECOND_SNAP_DB * second)),
                  [(2398, -2.5, 0.027), (2724, -6.0, 0.0083), (4440, -10.5, 0.011)])
    snap = gain_from_db(-8.0) * (bright - ring(crack, [(1390, 5.0, 0.015)]))
    rush = gain_from_db(-13.5) * fade(crack, 0.077) + gain_from_db(-25.0) * fade(crack, 0.38) - gain_from_db(-17) * fade(crack, 0.0056)
    return kick + rasp + snap + can + pipe + thump + rush * noise(BLAST)


# f/Hz, level/dB
AIR = [(6000, 0), (10000, -1), (13500, 0), (14600, -17)]


def through_air(near):
    size = next_fast_len(N + SR)
    near = irfft(rfft(near, size) * shape(AIR, size), size)[:N]
    tail = np.exp(-np.log(1000) * np.arange(SR // 2) / SR / .5)
    houses = signal.fftconvolve(near, rng.standard_normal(SR // 2) * tail)[:N]
    houses[int(JUMP_S * SR):] *= .3
    return near + gain_from_db(-41.5) * houses


# f/Hz, level/dB
APART = [(60, -25), (110, -19.5), (200, -27), (380, -12), (700, -13.5), (1290, -7.5), (2380, -9),
         (4400, -7.5), (8120, -8.5), (15000, -3.5)]
# f/Hz, level/dB
TILT = [(60, 1), (110, -1), (200, -0.5), (380, 0), (700, -1.5), (1290, 2.5), (2380, -2.5), (4400, -2),
        (8120, -0.5), (15000, 6.5)]
LEFT_LAG_S = 2e-5


def two_ports(mono):
    size = next_fast_len(N + SR)
    mid = rfft(mono, size)
    scatter = rfft(unit(rng.standard_normal(7200) * np.exp(-np.arange(7200) / 1800.)) / 60, size)
    short = shape([(30, -30), (140, 0)], size)
    lag_s = LEFT_LAG_S * shape([(4000, 0), (8000, -14)], size)
    lag = np.exp(-2j * np.pi * np.arange(size // 2 + 1) * SR / size * lag_s)
    side = short * scatter / (np.abs(scatter) + 1e-9) * shape(APART, size)
    tilt = shape(TILT, size) ** (short / 2)
    return irfft(mid * np.array([(1 + side) * tilt * lag, (1 - side) / tilt]), size)[:, :N]


def scene():
    surroundings = on_deck() * (traffic() + coolant_pump() + deck() + soles()) + porch()
    sharp = ticks() + taps() + knocks() + clacks() + firings()
    return two_ports(surroundings + through_air(sharp) + engine())


def top_cut(x):
    return signal.sosfilt(signal.butter(12, 15610, fs=SR, output="sos"), x)


TOP_HZ, LIMIT_DB = 15150, -0.3


def record(dry):
    cut = signal.sosfilt(signal.ellip(8, .2, 70, TOP_HZ, fs=SR, output="sos"), dry)
    peak = uniform_filter1d(-minimum_filter1d(-np.abs(cut).max(axis=0), size=500), size=700)
    held = cut * np.minimum(gain_from_db(LIMIT_DB) / (peak + 1e-9), 1) ** 0.4
    return top_cut(np.clip(held, -1, 1))


dry = scene()
out = record(dry)
dump(out)
```